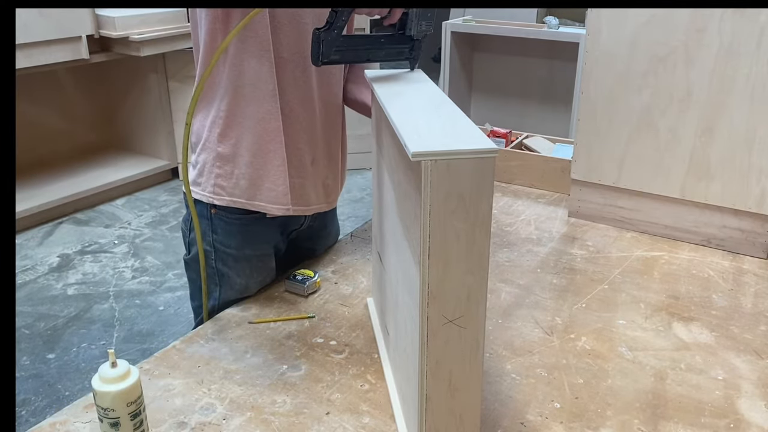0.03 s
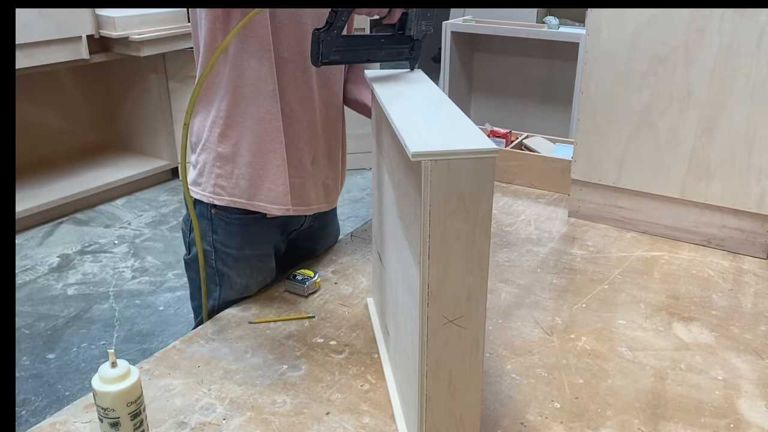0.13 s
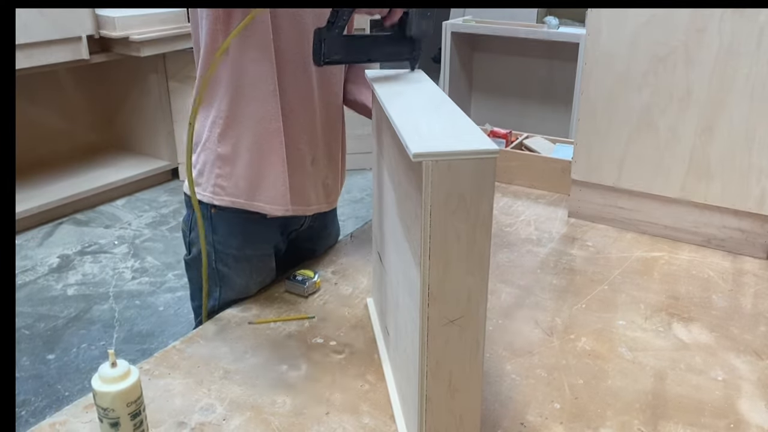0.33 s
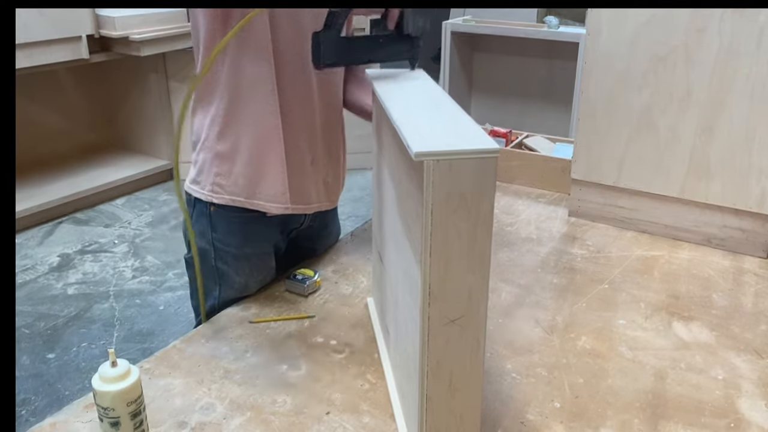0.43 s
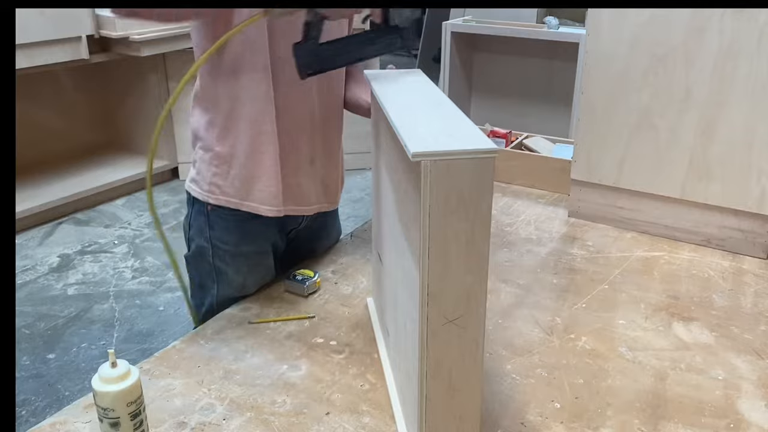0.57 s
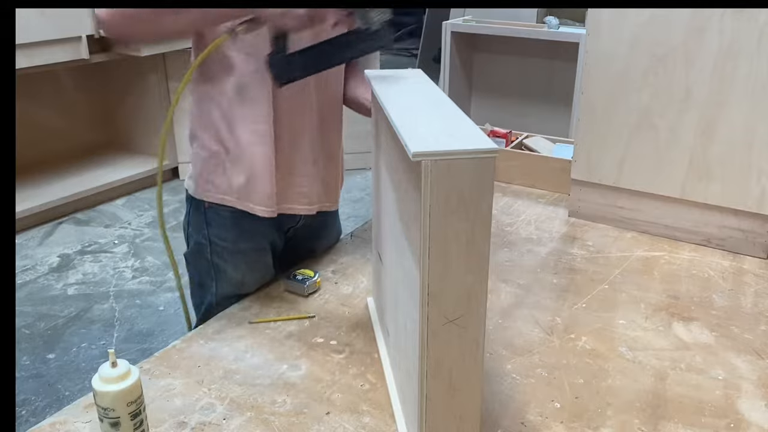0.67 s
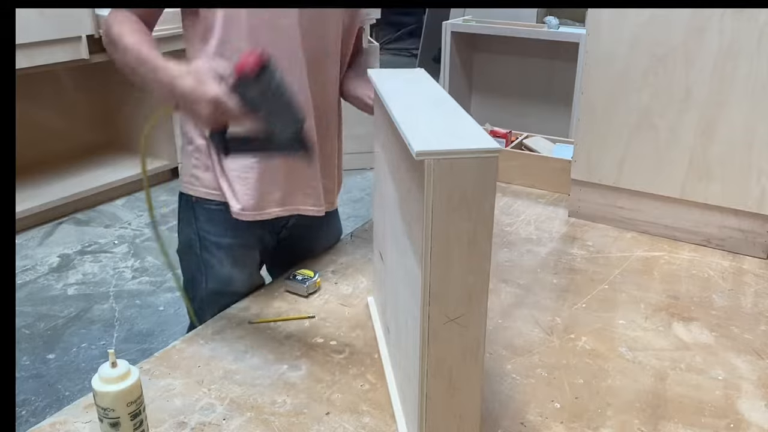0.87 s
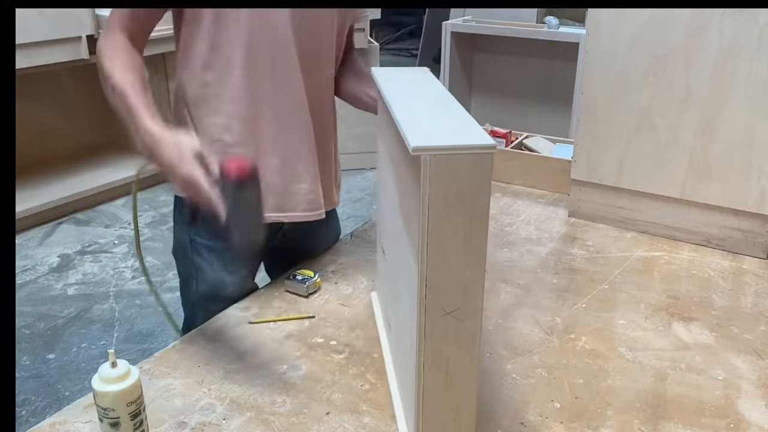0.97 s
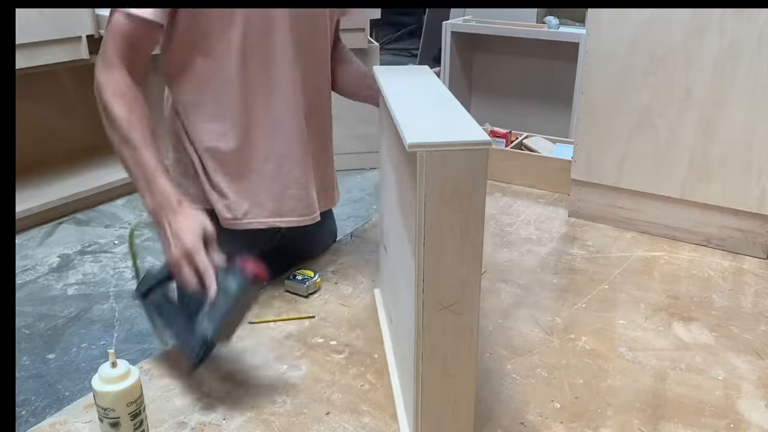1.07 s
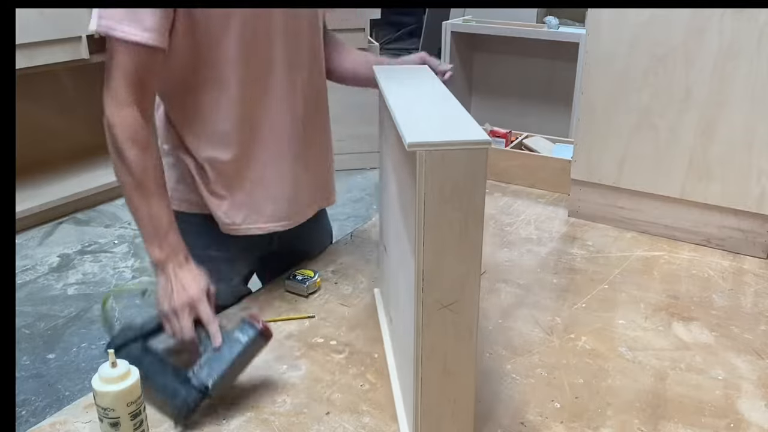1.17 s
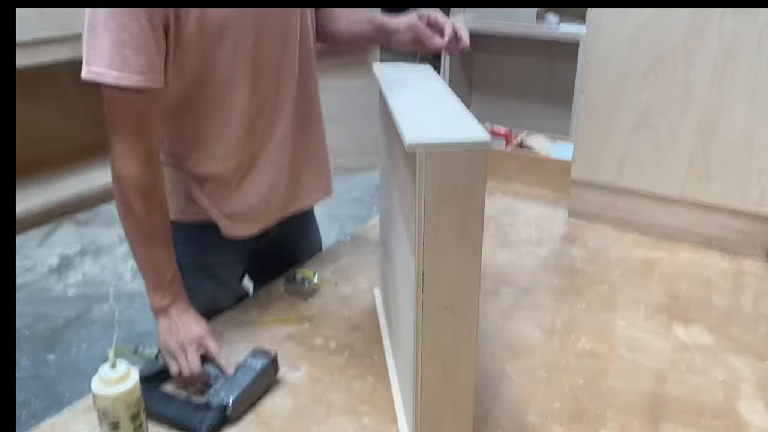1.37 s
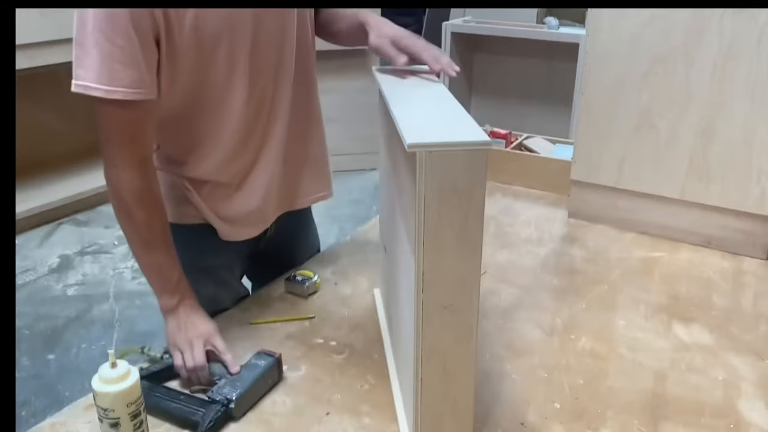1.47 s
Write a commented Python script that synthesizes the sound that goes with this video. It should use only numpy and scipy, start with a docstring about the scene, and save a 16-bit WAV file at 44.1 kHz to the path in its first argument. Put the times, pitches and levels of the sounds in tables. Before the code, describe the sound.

A pneumatic nailer fires once into a plywood box, a hard crack and a burst of escaping air close together, ringing through a workshop; then a hose rubs softly and the tool knocks onto a wooden bench. Close, overloaded microphone.

```python
"""Over a low rumble, the trigger valve of an air nailer spits; the driver slams a brad into a plywood box.
The exhaust blows off with a falling whistle as the piston returns; metal housing and workshop ring on.
The tool swings down, its hose rubbing, and clatters onto the wooden bench.
Blasts, knocks and rubbing are shaped noise; box, housing and bench are decaying sines.
A limiter and soft overload hold the blasts down, as in an overloaded microphone."""
import sys
import numpy as np
from scipy import signal
from scipy.fft import rfft, irfft
from scipy.io import wavfile
from scipy.ndimage import uniform_filter1d, minimum_filter1d

SR = 44100
rng = np.random.default_rng(int(sys.argv[2]) if len(sys.argv) > 2 else 0)


def put_to_file(sound):
    """Save the sound as 16-bit audio at rate SR, in the file named by the first command-line argument."""
    columns = np.atleast_2d(sound).T  # one column per channel
    safe = np.clip(columns, -1, 1)
    whole_steps = np.round(safe * 32767)
    wavfile.write(sys.argv[1], SR, whole_steps.astype(np.int16))


N = 66150
T = np.arange(N) / SR

# Relative noise spectra: f/Hz, density/dB per Hz
# Trigger valve spit
VALVE_SPECTRUM = [(100, -23.5), (700, -23), (1500, -14.5), (3200, -1.5), (4300, -3), (6000, -13),
                  (10500, -6.5), (16000, -17)]
# Driver on the nail; piston on its stop
BLOW_SPECTRUM = [(40, -14), (130, -8.5), (400, -15), (750, -10), (1100, -6), (2000, -0.5), (2800, 3),
                 (3900, 9), (4600, 0), (5500, 4), (8000, -6.5), (11000, -7.5), (16000, -18.5)]
# Escaping air
EXHAUST_SPECTRUM = [(40, -13.5), (160, -7.5), (400, -14), (1200, -12), (2100, -12.5), (2900, -4),
                    (4200, -6), (5400, 1.5), (6800, -2.5), (8300, -1.5), (11000, -4.5), (13000, -7),
                    (16000, -15.5)]
# Low thud of driver push and bench thumps
THUD_SPECTRUM = [(60, -3.5), (300, -0.5), (1000, 2.5), (1800, -18.5), (5000, -13.5), (16000, -35.5)]
# Tool knocking on the bench
KNOCK_SPECTRUM = [(60, -13), (300, 4), (650, -10.5), (1100, -1), (2400, -2), (3600, -9.5), (6300, -5),
                  (8000, -17), (11000, -15.5), (16000, -33.5)]
# Clicks of the tool's loose parts
TICK_SPECTRUM = [(200, -10), (1500, -11.5), (2900, 5), (4200, -0.5), (6000, 1), (8500, -7), (11500, -4.5),
                 (16000, -24)]
# Hose rubbing
HOSE_SPECTRUM = [(100, -0.5), (200, -3), (500, -5.5), (1300, -5.5), (1560, 0), (1850, -7), (3000, -5.5),
                 (4400, -10), (7000, -11), (8500, -16.5), (10700, -17.5), (13000, -28), (16000, -35.5)]
# Bench shuddering under the box after the shot
SHUDDER_SPECTRUM = [(15, -11.5), (35, -3), (48, 0.5), (70, -5), (108, -3.5), (140, -23.5), (300, -48.5),
                    (1000, -90)]
# Faint room air
AIR_SPECTRUM = [(60, -10), (107, -0.5), (150, -11.5), (280, -5), (500, -13), (1100, -14.5), (1700, -17),
                (2500, -28), (6000, -30), (16000, -34.5)]
# Low background rumble
RUMBLE_SPECTRUM = [(5, -2.5), (14, 3.5), (28, -4.5), (50, -7), (72, -29.5), (110, -43.5), (200, -51.5),
                   (600, -91.5)]

# Vibration modes: f/Hz, level/dB, t60/s
# Plywood box
BOX_MODES = [(106.7, -9.5, 0.2), (137.5, -3, .05), (172.6, 4.5, 0.11), (230, -1.5, 0.076), (419.3, 3, 0.11),
             (700, 5, 0.08), (1078, 10, 0.1), (1130, 11.5, 0.076), (1431, 3, .07)]
# Metal housing, strong modes
HOUSING_MODES = [(2836, -4, .22), (3560, -5, .3), (3611, -4, .3), (3945, -1, .28), (4572, -6, .33),
                 (4789, -3, .36), (5312, 0, .32), (5436, -3, .28), (5726, -1, .32), (6561, -2, .33),
                 (6857, -3, .28), (7433, -2, .27), (8635, -6, .25), (9505, -8, .28)]
# Wooden bench
BENCH_MODES = [(42, 3, 0.72), (57.407, 1.5, .3), (111.41, -15, 0.22), (122.07, 0, 0.29), (250, 1, 0.15),
               (396, -2, 0.044)]
# Range of the housing's many weaker modes: lowest f/Hz, highest f/Hz
FINE_RANGE_HZ = (2460, 11930)

# Impacts on the box: driver t/s, tool dropping back t/s
BOX_HITS_S = (.2275, .3062)
# Exhaust whistle falling with the pressure: t/s, f/Hz
JET_CURVE = [(.313, 12500), (.321, 10600), (.3245, 8200), (.327, 5600), (.336, 5100)]
# Tool knocks on the bench: t/s, level/dB, t60/s
KNOCK_EVENTS = [(1.2875, -36.5, 0.026), (1.292, -35, 0.0146), (1.3015, -34, 0.015), (1.3664, -26, 0.016),
                (1.434, -52.5, 0.025)]
# Loose-part clicks: t/s, level/dB, t60/s, tilt/dB per octave
TICK_EVENTS = [(0.502, -39, 0.04, 4.5), (.767, -57.5, .008, -2.5), (1.2492, -43, 0.045, -1.5)]
# Rubber grip bumping the bench: t/s, level/dB
THUMP_EVENTS = [(1.283, -44), (1.3646, -48), (1.4986, -28.5)]
# Hose sliding as the arm swings down: t/s, level/dB
SLIDE_CURVE = [(0, -73.5), (.02, -67), (.06, -87), (.55, -84.5), (.64, -56), (.72, -69.5), (.82, -67.5),
               (.91, -61), (1.04, -60.5), (1.12, -67.5), (1.2, -72), (1.3, -59.5), (1.5, -64.5)]

# Workshop decay: f/Hz, t60/s
ROOM_DECAY = [(60, .7), (250, 0.58), (1000, 0.88), (2500, 0.78), (4000, 0.68), (6000, .47), (9000, .36),
              (15000, .25)]
# Colour of the workshop tail: f/Hz, level/dB
ROOM_COLOUR = [(60, 1.5), (110, 1.5), (175, 2), (400, 4.5), (1200, -1.5), (3000, -4.5), (6000, 1),
               (10000, 1), (16000, -8)]
# Early reflections: t/s, gain
REFLECTIONS = [(.003, .25), (.007, .18), (.021, .15), (.028, .13), (.034, 0.074)]

ROOM_DB, BENCH_ROOM_DB, ROOM_BUILD_S = -15.5, -14.5, 0.015
PAD_HZ = 290.3  # the soft nose pad excites mainly the box modes below this
CEILING_DB, EDGE_HZ = -3.3, 15800


def amp(db):
    """Decibels to gain."""
    return 10 ** (np.asarray(db) / 20)


def unit(x):
    """Scale to rms 1."""
    return x / np.sqrt(np.mean(x ** 2) + 1e-20)


def read(points, hz):
    """Interpolate a table on a log-frequency axis."""
    f, value = np.transpose(points)
    return np.interp(np.log(hz + 1), np.log(f + 1), value)


def noise(spectrum, tilt_db_oct=0):
    """Steady rms-1 noise of a given spectrum, tilted per octave."""
    hz = np.fft.rfftfreq(N, 1 / SR)
    level_db = read(spectrum, hz) + tilt_db_oct * np.log2(hz + 1)
    white = rng.standard_normal(N)
    return unit(irfft(rfft(white) * amp(level_db), N))


def burst(start_s, attack_s, hold_s, t60_s):
    """Envelope: straight rise, hold, exponential fall."""
    t = T - start_s
    rise = np.clip(t / max(attack_s, 1 / SR), 0, 1)
    fall = np.exp(-np.log(1000) * np.maximum(t - attack_s - hold_s, 0) / t60_s)
    return rise * fall


def ring(modes, start_s, attack_s):
    """Sum of decaying modes excited at one moment, random phases."""
    total = np.zeros(N)
    for hz, db, t60_s in modes:
        sine = np.sin(2 * np.pi * (hz * T + rng.random()))
        total += amp(db) * burst(start_s, attack_s, 0, t60_s) * sine
    return total


def fine_modes(count, spread_db, t60_low_s, t60_high_s):
    """Crowd of weak metal modes, the higher ones dying sooner."""
    jitter, size = rng.random((count, 2)).T
    place = (np.arange(count) + jitter) / count
    hz = np.interp(place, [0, 1], FINE_RANGE_HZ)
    t60_s = t60_low_s + (t60_high_s - t60_low_s) * place
    return np.transpose([hz, -spread_db * size, t60_s])


def whistle(hz, pole_width_hz):
    """Noise through a double-pole resonance that follows a frequency curve."""
    turn = np.exp(2j * np.pi * np.cumsum(hz) / SR)
    r = np.exp(-np.pi * pole_width_hz / SR)
    # Shift to 0 Hz, filter, shift back
    resonant = signal.lfilter([1], np.poly([r, r]), rng.standard_normal(N) / turn)
    return unit((turn * resonant).real)


def shot(fine):
    """Valve spits, driver hits nail, box and housing ring; air leaks while the trigger is held."""
    valve = amp(-22) * noise(VALVE_SPECTRUM) * burst(0.2092, 0.0045, hold_s=0.002, t60_s=0.033)
    push = amp(-21) * noise(THUD_SPECTRUM) * burst(0.2265, 0.0023, hold_s=0.0052, t60_s=0.045)
    blow = amp(-1) * noise(BLOW_SPECTRUM) * burst(0.2283, 0.0025, hold_s=0.004, t60_s=0.03)
    metal = amp(-34.5) * ring(HOUSING_MODES, start_s=0.229, attack_s=0.003)
    fine_metal = amp(-47.5) * ring(fine, start_s=0.229, attack_s=0.003)
    leak = amp(-37) * noise(EXHAUST_SPECTRUM) * burst(0.21, 0.0071, hold_s=0.084, t60_s=0.068)
    box = amp(-31) * ring(BOX_MODES, BOX_HITS_S[0], attack_s=0.0005)
    return valve + push + blow + metal + fine_metal + leak + box


def exhaust(fine):
    """Tool drops back on the box; air blows off with a falling whistle; piston hits its stop."""
    padded = [(hz, db - 20 * np.log10(1 + (hz / PAD_HZ) ** 4), t60_s) for hz, db, t60_s in BOX_MODES]
    thud = amp(-30) * ring(padded, BOX_HITS_S[1], attack_s=0.0024)
    spit = amp(-36.5) * noise(EXHAUST_SPECTRUM) * burst(0.3063, 0.00045, hold_s=0.006, t60_s=0.017)
    air = amp(-9) * noise(EXHAUST_SPECTRUM) * burst(0.3128, 0.0004, hold_s=0.01, t60_s=0.074)
    jet_hz = np.interp(T, *np.transpose(JET_CURVE))
    jet = amp(-8) * whistle(jet_hz, pole_width_hz=1600) * burst(0.315, 0.008, hold_s=0.007, t60_s=0.026)
    stop = amp(-13.5) * noise(BLOW_SPECTRUM) * burst(0.328, 0.0025, hold_s=0.00093, t60_s=0.031)
    metal = amp(-34.5) * ring(HOUSING_MODES, start_s=0.318, attack_s=0.014)
    fine_metal = amp(-46.5) * ring(fine, start_s=0.34, attack_s=0.008)
    return thud + spit + air + jet + stop + metal + fine_metal


def knocks():
    """Tool on bench: short noise bursts."""
    return sum(amp(db) * noise(KNOCK_SPECTRUM) * burst(s, 0.0009, hold_s=0.00062, t60_s=t60_s)
               for s, db, t60_s in KNOCK_EVENTS)


def ticks():
    """Loose parts clicking: sharp noise bursts, each with its own brightness."""
    return sum(amp(db) * noise(TICK_SPECTRUM, tilt) * burst(s, 0.00019, hold_s=0.00081, t60_s=t60_s)
               for s, db, t60_s, tilt in TICK_EVENTS)


def thumps():
    """Rubber grip on bench: bench modes plus a brief contact thud."""
    total = np.zeros(N)
    for s, db in THUMP_EVENTS:
        modes = ring(BENCH_MODES, s, attack_s=0.0032)
        contact = amp(6.5) * noise(THUD_SPECTRUM) * burst(s, 0.000098, hold_s=0.00065, t60_s=0.0073)
        total += amp(db) * (modes + contact)
    return total


def hose():
    """Soft rubbing noise, its level slightly uneven."""
    grain = unit(uniform_filter1d(rng.standard_normal(N), size=300))
    rubbing = noise(HOSE_SPECTRUM)
    return rubbing * amp(np.interp(T, *np.transpose(SLIDE_CURVE)) + 0.85 * grain)


def bench_shudder():
    """Low noise swelling and dying as the bench shudders under the box."""
    return amp(-35) * noise(SHUDDER_SPECTRUM) * burst(0.23, 0.04, hold_s=0.066, t60_s=0.64)


def workshop(x, wet_db):
    """Direct sound, near reflections scattered by clutter, and a diffuse tail with per-band decay."""
    hz, t, z = signal.stft(rng.standard_normal(N), SR, nperseg=256)
    decay = np.exp(-np.log(1000) * t / read(ROOM_DECAY, hz)[:, None])
    z = z * decay * amp(read(ROOM_COLOUR, hz))[:, None]
    tail = signal.istft(z, SR, nperseg=256)[1][:N] * np.minimum(T / ROOM_BUILD_S, 1)
    response = amp(wet_db) * tail / np.linalg.norm(tail)
    for s, gain in REFLECTIONS:
        scatter = rng.standard_normal(N) * burst(s, 0.0001, hold_s=0, t60_s=0.015)
        response = response + gain * scatter / np.linalg.norm(scatter)
    return x + signal.fftconvolve(x, response)[:N]


def background():
    """Steady faint room air and low rumble."""
    return amp(-70) * noise(AIR_SPECTRUM) + amp(-49.5) * noise(RUMBLE_SPECTRUM)


def scene():
    """Nailer and bench contacts in the room; hose, shudder and background added without it."""
    fine = fine_modes(count=110, spread_db=10.5, t60_low_s=0.33, t60_high_s=0.18)
    floor = background()
    shudder = bench_shudder()
    nailer = workshop(shot(fine), ROOM_DB) + workshop(exhaust(fine), ROOM_DB)
    handling = workshop(knocks() + ticks() + thumps(), BENCH_ROOM_DB)
    return (nailer + shudder + handling + hose() + floor)[None]


def record(dry):
    """Fast limiter, soft overload, then the band limit."""
    ceiling = amp(CEILING_DB)
    # The limiter lets 3 dB over the ceiling into the soft overload
    gain = np.minimum(1, amp(3) * ceiling / (abs(dry) + 1e-9))
    smooth_gain = uniform_filter1d(minimum_filter1d(gain, size=21), size=21)
    held = dry * smooth_gain / ceiling
    rounded = ceiling * held / (1 + held ** 6) ** (1 / 6)
    lowpass = signal.firwin(401, EDGE_HZ, window=("kaiser", 8), fs=SR)
    return signal.oaconvolve(rounded, lowpass[None], "same")


dry = scene()
out = record(dry)
put_to_file(out)
```